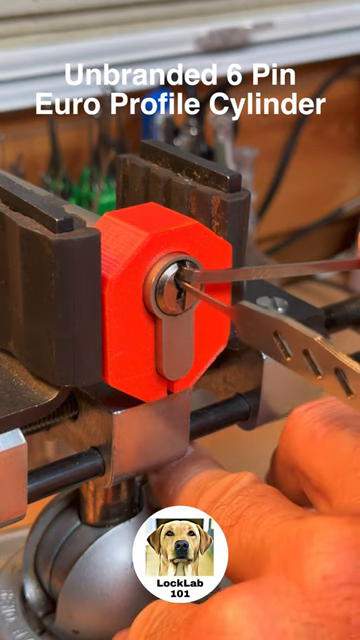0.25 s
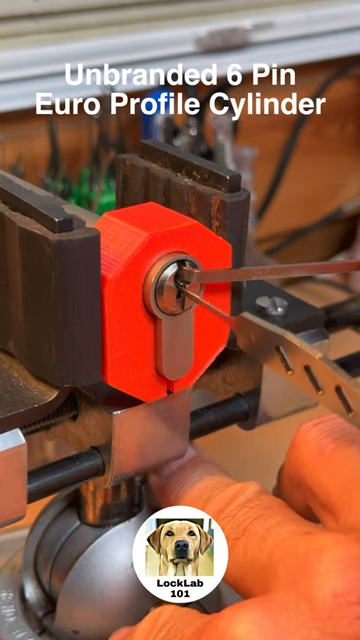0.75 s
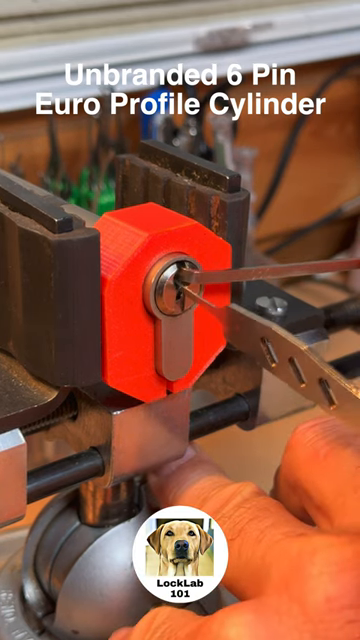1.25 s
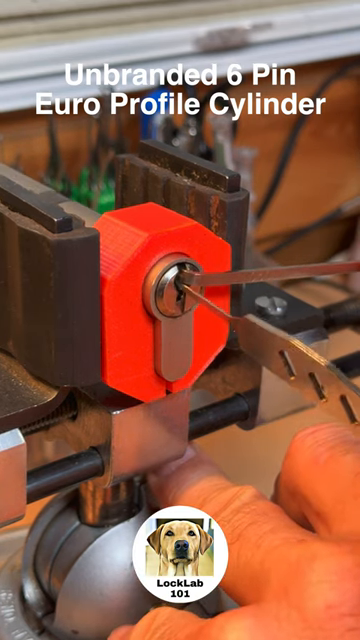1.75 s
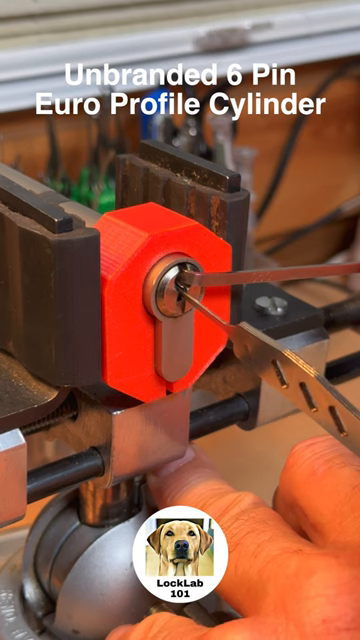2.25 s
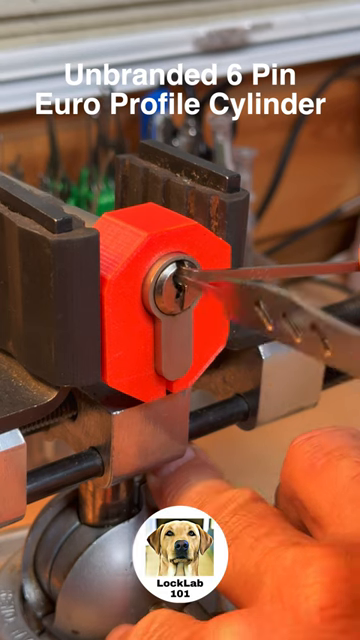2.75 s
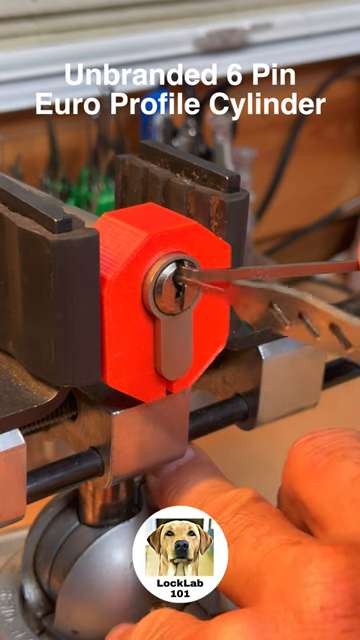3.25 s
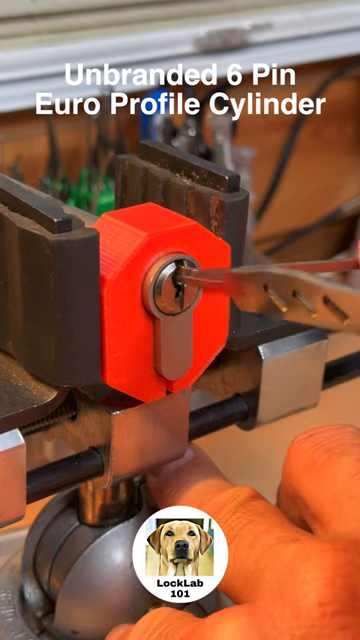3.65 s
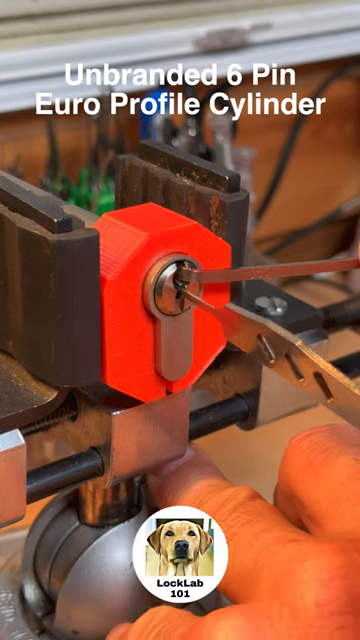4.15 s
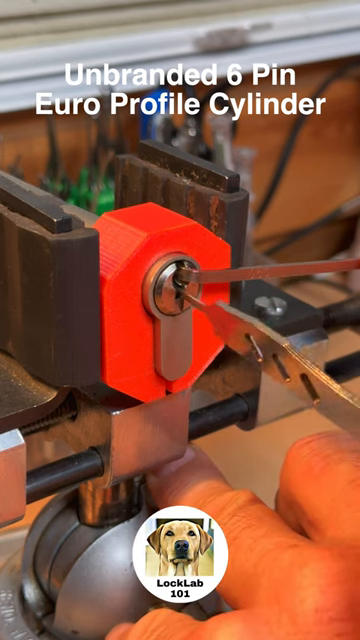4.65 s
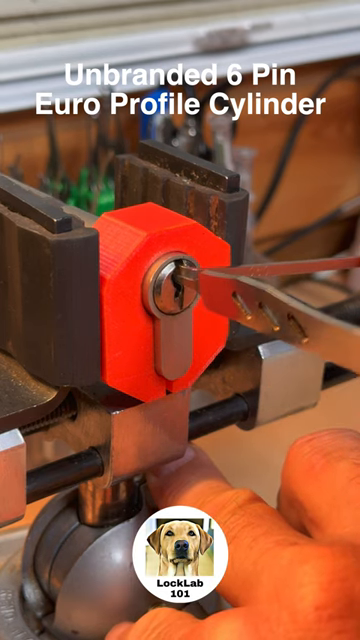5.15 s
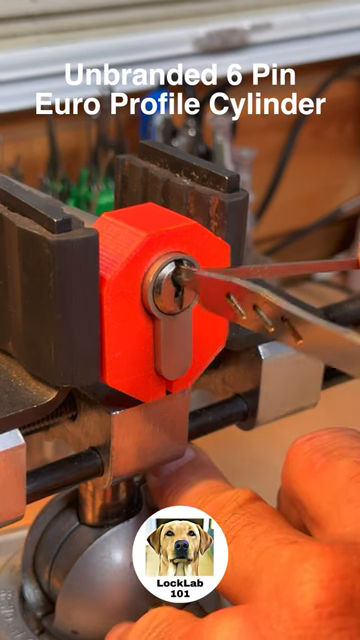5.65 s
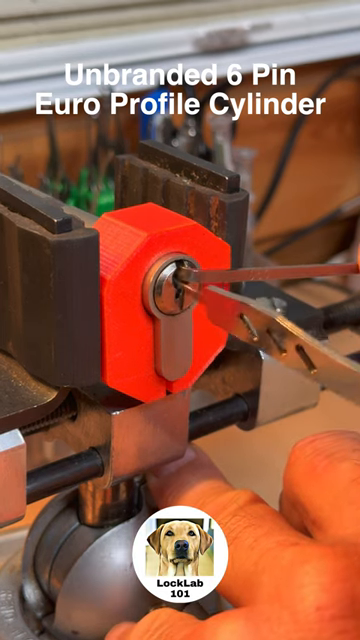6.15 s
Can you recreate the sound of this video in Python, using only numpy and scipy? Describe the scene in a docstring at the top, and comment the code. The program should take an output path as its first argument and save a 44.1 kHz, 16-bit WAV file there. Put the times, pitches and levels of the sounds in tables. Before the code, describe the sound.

A steel pick clicks, scrapes and slips over lock pins in a plastic block, with dull knocks, faint hum and a faint clock tick.

```python
"""A steel pick lifts the pins of a lock held in a plastic block in a bench vice, for about six seconds.
From the start the room hums and whines faintly, a clock ticks each second, and fingers rub (filtered noise).
Slips of the pick begin at 0.1 s: bursts of tiny metal contacts, each followed by a holder knock and a stand thump.
Creaks join at 0.5 s and singing tones of the pick at 1.4 s; the hardest slip comes at 2.1 s, a strong pair at
3.5 s, and slips go on to the end. Last, a noise suppressor turns the steady noise down between the sounds."""
import sys
import numpy as np
from scipy import signal
from scipy.fft import rfft, irfft, next_fast_len
from scipy.io import wavfile
from scipy.ndimage import uniform_filter1d

SR = 44100
rng = np.random.default_rng(int(sys.argv[2]) if len(sys.argv) > 2 else 0)


def put_to_file(sound):
    """Save the sound as 16-bit audio at rate SR, in the file named by the first command-line argument."""
    columns = np.atleast_2d(sound).T  # one column per channel
    safe = np.clip(columns, -1, 1)
    whole_steps = np.round(safe * 32767)
    wavfile.write(sys.argv[1], SR, whole_steps.astype(np.int16))


N = 281799  # length in samples


def from_db(db):
    """Turn decibels into a plain loudness factor."""
    return 10 ** (np.asarray(db) / 20)


def rms_one(x):
    """Scale a signal to an average strength (rms) of 1."""
    return x / np.sqrt(np.mean(x ** 2) + 1e-20)


def at_hz(points, hz):
    """Read a curve of (Hz, value) points, with straight lines over log frequency."""
    point_hz, values = np.array(points).T
    return np.interp(np.log(hz), np.log(np.maximum(point_hz, 1)), values)


def band(x, low, high):
    """Keep only the part of a sound between two frequencies."""
    return signal.sosfilt(signal.butter(2, [low, high], "band", fs=SR, output="sos"), x + 1e-18)


def drift(rate):
    """Slow random wandering of spread about 1; a higher rate wanders faster."""
    knots = rng.standard_normal(int(N / SR * 100) + 2)  # 100 per second
    width = max(int(50 / rate), 1)
    smooth = uniform_filter1d(uniform_filter1d(knots, width), width)
    return np.interp(np.arange(N) / SR * 100, np.arange(len(knots)), rms_one(smooth))


def ring(force, modes):
    """A force sets several modes ringing side by side; each is a tone that dies away."""
    out = 0
    for k, (hz, level_db, t60) in enumerate(modes):
        r = from_db(-60 / (t60 * SR))  # what is left after one sample
        w = 2 * np.pi * hz / SR
        tone = signal.lfilter([0, np.sin(w)], [1, -2 * r * np.cos(w), r * r], force + 1e-18)
        out = out + (-1) ** k * from_db(level_db) * tone  # signs alternate
    return out


def grit(shape, spread_db):
    """Dense contacts of uneven size, as noise of rms 1."""
    return rms_one(rng.standard_normal(shape) * from_db(spread_db * rng.standard_normal(shape)))


def swells(rows):
    """Each row (start s, length s, dB) rises and falls smoothly over its length."""
    out = np.zeros(N + SR)
    for s, length, level_db in rows:
        shape = np.hanning(int(length * SR))
        at = round(s * SR)
        out[at:at + len(shape)] += from_db(level_db) * shape
    return out[:N]


def pushes(levels_db, soft_s, delay_s):
    """One rounded push for every slip, a little after it; a longer push is softer."""
    force = np.zeros(N + SR)
    at = ((np.array(SLIPS)[:, 0] + delay_s) * SR).astype(int)
    force[at] = from_db(levels_db)
    shape = np.hanning(int(soft_s * SR) + 3)
    return np.convolve(force, shape / shape.sum())[:N]


# Colour of the room noise. Each row: frequency in Hz, relative level in dB per Hz.
AIR_COLOUR = [(30, -7), (60, -3), (130, -8.5), (300, -20), (700, -26), (1500, -33.5), (3500, -42.5),
              (7000, -44.5), (11000, -46), (16000, -70.5)]
# How alike the left and right ports hear the room. Each row: frequency in Hz, likeness (0 none, 1 the same).
LIKENESS = [(60, 0.99), (200, .9), (300, 0.22), (480, 0.37), (800, 0), (1300, .3), (1700, 1), (16000, 0.93)]
# Mains hum and electric whines. Each row: frequency in Hz, level in dB rms before the waver.
HUM_TONES = [(200, -69), (7381, -87.5), (10637, -102), (14761, -90)]
AIR_DB, HUM_WAVER_DB = -61.5, 1.5


def two_ports(mid, side, hz):
    """Blend shared and opposite noise into left and right, as alike as the room makes them at this frequency."""
    alike = np.clip(at_hz(LIKENESS, hz), 0, 1)
    return np.sqrt(1 + alike) * mid + np.sqrt(1 - alike) * side * [[1], [-1]]


def air():
    """Room noise, least alike at the two ports in the middle range, with mains hum and thin electric whines."""
    hz = np.maximum(np.arange(N // 2 + 1) * SR / N, 1)
    mid, side = rfft(rng.standard_normal((2, N)))
    both = two_ports(mid, side, hz)
    out = from_db(AIR_DB) * rms_one(irfft(both * from_db(at_hz(AIR_COLOUR, hz)), N))
    for tone_hz, level_db in HUM_TONES:
        size = np.sqrt(2) * from_db(level_db + HUM_WAVER_DB * drift(8))
        out += size * np.sin(2 * np.pi * tone_hz * np.arange(N) / SR)
    return out


# How long the room echoes. Each row: frequency in Hz, time in seconds to fall by 60 dB.
ROOM_DECAY = [(300, 0.2), (1000, 0.17), (3000, 0.18), (8000, .2), (15000, 0.027)]
# Tone of the echoes. Each row: frequency in Hz, relative level in dB.
ROOM_TONE = [(300, 2), (800, 2.5), (2000, -3), (15000, -4.5)]
ROOM_DB, ROOM_RISE_S = -11, 0.0024


def room(x):
    """Dense reflections: noise that dies band by band, as alike at the two ports as the room noise."""
    t = np.arange(int(.4 * SR)) / SR
    edges = 200 * 2 ** np.arange(0, 7.0, .5)  # half-octave bands from 200 Hz
    tail = 0
    for low, high in zip(edges, edges[1:]):
        mid, side = band(rng.standard_normal((2, len(t))), low, high)
        hz = np.sqrt(low * high)
        fade_db = -60 * t / at_hz(ROOM_DECAY, hz)
        tail = tail + two_ports(mid, side, hz) * from_db(fade_db + at_hz(ROOM_TONE, hz))
    tail *= np.clip(t / ROOM_RISE_S, 0, 1) ** 2
    tail /= np.sqrt(np.sum(tail ** 2) / 2)
    return from_db(ROOM_DB) * signal.oaconvolve(x[None], tail, axes=1)[:, :N]


# Clock ticks. Each row: start in seconds, relative level in dB.
CLOCK_TICKS = [(0.005, -70.5), (1, -77), (2.002, -70.5), (3.0, -82), (4.001, -70.5), (5.001, -77.5),
               (6.001, -65.5)]
# Rattles within one tick. Each row: delay in seconds, relative level in dB.
TICK_RATTLES = [(0, 0.5), (.008, 4), (0.022, 1.5), (0.037, -5.5), (0.059, -5)]
# Ringing of the clock case. Each row: frequency in Hz, relative level in dB, seconds to fall by 60 dB.
CLOCK_CASE = [(1110, -4.5, 0.027), (1248, 8, .07), (1849, -16, .02), (2850, -4.5, 0.031),
              (4100, -2.5, 0.019), (5000, -17.5, .02)]


def clock():
    """Each tick is a few blurred rattles, heard directly and through the case."""
    force = np.zeros(N + SR)
    t = np.arange(SR // 10) / SR
    for s, level_db in CLOCK_TICKS:
        for delay, step_db in TICK_RATTLES:
            at = round((s + delay) * SR)
            fade = from_db(level_db + step_db - 24 - 60 * t / .06)
            force[at:at + len(t)] += fade * rng.standard_normal(len(t))
    force = force[:N]
    return ring(force, CLOCK_CASE) + from_db(21.5) * band(force, 900, 16000)


# Hands on the tools. Each row: time in seconds, relative rub on the holder in dB, relative stand sway in dB.
HAND_MOVES = [(0.0, -80.5, -79), (0.16, -51.5, -60), (0.4, -88, -69.5), (0.6, -69, -56.5),
              (1.1, -97, -75.5), (1.42, -71.5, -54), (1.6, -93, -68.5), (2.0, -76.5, -70),
              (2.4, -66, -53.5), (2.7, -87.5, -75.5), (3.05, -96, -80), (3.2, -62.5, -65),
              (3.55, -67.5, -58.5), (3.85, -67.5, -71.5), (4.7, -75.5, -68.5), (5.3, -66, -65.5),
              (5.75, -74.5, -56.5), (6.1, -62, -70), (6.39, -61.5, -54)]


def hands():
    """Glide from row to row, giving the levels of the rub and of the sway over time."""
    s, rub_db, sway_db = np.transpose(HAND_MOVES)
    t = np.arange(N) / SR
    return np.interp(t, s, rub_db), np.interp(t, s, sway_db)


# Vice on its ball stand. Each row: frequency in Hz, relative level in dB, seconds to fall by 60 dB.
STAND_MODES = [(53.3, 5, .25), (82, -1, 0.14), (97, -12, 0.9), (121, 1, 0.1)]


def stand(sway_db):
    """The heavy stand thumps in low, slow tones after each slip and sways under the hands."""
    sway = from_db(sway_db) * rms_one(ring(rng.standard_normal(N), STAND_MODES))
    thump_db = np.array(SLIPS)[:, 6]
    thump = ring(pushes(thump_db, soft_s=0.0049, delay_s=0.0092), STAND_MODES)
    return from_db(3.5) * thump + from_db(-3.5) * sway


# Plastic holder. Each row: frequency in Hz, relative level in dB, seconds to fall by 60 dB.
HOLDER_MODES = [(416.7, -3, 0.074), (439.4, 3, 0.046), (479.3, 3, 0.06), (607, -5.5, .06),
                (714.7, -6.5, 0.046), (782.3, -12, 0.043), (888, -18, 0.13), (1110, -5.5, 0.03)]
# Jaws of the vice. Each row: frequency in Hz, relative level in dB, seconds to fall by 60 dB.
JAW_MODES = [(150, -4, 0.063), (218, -2, 0.038), (269, -5, 0.24), (318.6, 2, 0.097), (366.5, -6.5, 0.11)]
# The holder creaks under the wrench. Each row: start in seconds, length in seconds, relative level in dB.
HOLDER_CREAKS = [(0.51, 0.16, -60.5), (0.87, 0.087, -52), (1.87, .065, -73.5), (2.28, 0.062, -56),
                 (2.34, 0.084, -51), (2.42, 0.087, -41), (3.03, 0.039, -46), (3.09, .07, -57.5),
                 (3.7, .13, -59.5), (3.875, .075, -58.5), (4.11, 0.086, -62), (4.195, 0.056, -61),
                 (4.75, .14, -52.5), (5.15, 0.064, -70), (5.57, 0.041, -66), (5.645, 0.047, -60),
                 (6.08, 0.16, -64.5)]
# The upper modes answer the metal: dB over it, and dB per dB of brightness.
RAP_DB, RAP_PER_BRIGHT = 3, -2.6


def holder(rub_db):
    """Block and jaws answer a few ms after each slip and mutter under the fingers; the block also creaks."""
    rub = from_db(rub_db + 2.6 * drift(25)) * grit(N, spread_db=3.5)
    creak = swells(HOLDER_CREAKS) * grit(N, spread_db=-1)
    metal_db, bright_db, knock_db, jaw_db = np.array(SLIPS)[:, 2:6].T
    knock = from_db(4.5) * pushes(knock_db, soft_s=0.0011, delay_s=.003)
    rap = pushes(metal_db + RAP_DB + RAP_PER_BRIGHT * bright_db, soft_s=0.0008, delay_s=.0025)
    jaw_push = from_db(-0.5) * pushes(jaw_db, soft_s=0.0022, delay_s=.004)
    # knocks and creaks wake the three lowest modes, raps the others, rubbing all of them
    block = ring(knock + from_db(-30.0) * creak, HOLDER_MODES[:3])
    block = block + ring(rap, HOLDER_MODES[3:])
    block = block + ring(from_db(-41.0) * rub, HOLDER_MODES)
    return block + ring(jaw_push + from_db(-32) * rub, JAW_MODES)


# Tip or shaft of the pick sings after it is caught; the pitch follows grip and free length.
# Each row: start in seconds, relative level in dB, seconds to fall by 60 dB, frequency in Hz.
PICK_TONES = [(1.38, -48, 0.058, 5400), (1.457, -58, 0.046, 5060), (1.47, -57, 0.035, 5050),
              (1.487, -63, 0.04, 4990), (2.405, -59, .06, 5200), (2.662, -65.5, 0.038, 5150),
              (2.69, -73, .04, 5160), (2.715, -56, 0.062, 5200), (3.034, -51, 0.047, 5050),
              (3.055, -49, .05, 5090), (3.075, -70, .15, 5050), (3.176, -72, .1, 5000),
              (3.212, -66, .1, 5080), (3.659, -64, 0.036, 4900), (3.72, -72.5, 0.044, 5100),
              (3.76, -65, 0.037, 5100), (3.803, -72, .03, 4970), (1.379, -51, 0.046, 1570),
              (1.46, -52, .04, 2880), (2.408, -51, 0.052, 2950), (2.695, -61, 0.043, 2580),
              (3.056, -64, .06, 2710), (3.083, -61, 0.046, 2680), (3.121, -68, .04, 2590),
              (3.212, -63, .05, 2750), (3.505, -34, .05, 1630), (3.72, -63.5, 0.044, 2800),
              (3.747, -56, 0.026, 2940), (3.76, -62, .03, 2780), (5.217, -48, 0.034, 1970),
              (5.958, -54, 0.046, 2805), (6.308, -56, .03, 2780), (6.351, -49, 0.034, 2730),
              (5.22, -55, 0.087, 5950), (5.385, -57, 0.082, 5790), (5.656, -53, 0.036, 2410)]
SING_ATTACK_S = 0.0013


def singing(width_hz):
    """A narrow resonance kept going by rough friction: a tone whose size and phase wander."""
    t, out = np.arange(N) / SR, np.zeros(N)
    slow = signal.butter(2, width_hz, fs=SR, output="sos")
    wander = signal.sosfilt(slow, rng.standard_normal((2, N)))
    wander = rms_one(wander[0]) + 1j * rms_one(wander[1])
    for s, level_db, t60, hz in PICK_TONES:
        at = round(s * SR)
        since = t[:min(SR // 2, N - at)]
        end = at + len(since)
        size = (1 - np.exp(-since / SING_ATTACK_S)) * from_db(level_db - 60 * since / t60)
        out[at:end] += size * np.real(wander[at:end] * np.exp(2j * np.pi * hz * since))
    return from_db(-1) * out


# Slips of the pick. Each row: start in seconds, seconds for the chatter to sink by 9 dB, then relative levels:
# metal in dB, brightness in dB per band, holder knock in dB, jaw knock in dB, stand thump in dB.
SLIPS = [(0.105, 0.013, -48, 0, -66, -77, -83), (0.112, 0.041, -54, -3, -45.5, -38, -53.5),
         (0.411, 0.0056, -42.5, 14, -40.5, -45.5, -40), (0.416, 0.0082, -39.5, 0, -34.5, -61, -65.5),
         (0.424, 0.013, -45, 5.5, -51, -36.5, -42.5), (0.6716, 0.0022, -64.5, -7, -51.5, -52, -74),
         (0.6798, 0.0046, -62, 7.5, -48.5, -57, -52.5), (0.691, 0.0039, -56, -0.5, -51.5, -66, -52),
         (0.715, 0.0021, -54.5, 6.5, -54, -54, -86), (0.8206, 0.0035, -60, -3, -48, -56, -79),
         (0.8343, 0.0094, -40.5, 5.5, -37, -41.5, -55), (0.911, 0.0015, -54, 3, -70, -51.5, -57),
         (1.369, 0.0082, -79, -2, -58, -62, -76), (1.3771, 0.0061, -49, 2, -51.5, -52.5, -63),
         (1.395, 0.0083, -58, 1.5, -53.5, -54, -60.5), (1.4594, 0.0051, -59, 0, -47, -46.5, -50.5),
         (1.472, 0.0059, -60, -2.5, -65, -50, -50), (1.49, 0.0095, -66.5, 1.5, -55, -59, -66.5),
         (1.898, .0061, -76.5, -1, -65, -78.5, -74.5), (1.978, 0.0055, -76.5, -3, -79, -66.5, -62.5),
         (2.0257, 0.0066, -62.5, 1.5, -53.5, -59, -63.5), (2.1261, 0.0039, -19.5, 3, -23, -40, -38),
         (2.396, 0.0092, -63.5, 6, -47, -73, -65), (2.4074, 0.0047, -40.5, 6, -42.5, -43.5, -55),
         (2.439, 0.0043, -56, -1.5, -48, -47.5, -51), (2.664, .0028, -68.5, 0.5, -80, -66, -60),
         (2.6689, 0.0023, -63, 2.5, -64, -55, -60), (2.6966, .0027, -62.5, -0.5, -55.5, -58.5, -64),
         (2.719, 0.0033, -66, -3, -66, -89, -69), (2.7282, 0.0038, -56, 1.5, -62, -58, -57.5),
         (2.7538, 0.0047, -46.5, 3, -49.5, -57, -54), (2.768, 0.005, -50, 2.5, -83, -66, -55.5),
         (3.0332, 0.0026, -54.5, 3, -57, -60.5, -60.5), (3.057, 0.006, -65, 5.5, -79, -61, -67.5),
         (3.0829, 0.0039, -60.5, 9, -72, -58.5, -60), (3.123, 0.0021, -64.5, 3.5, -76, -59.5, -73),
         (3.1375, 0.0036, -66, 3.5, -80, -64, -64.5), (3.18, .0027, -73, -1, -75, -64, -79),
         (3.192, .0037, -68, 4, -65, -72.5, -71), (3.2108, 0.0036, -63, 6.5, -60, -75.5, -69.5),
         (3.216, 0.022, -72.5, 5, -62.5, -68, -62), (3.238, 0.033, -73, 4, -64, -55.5, -58),
         (3.29, 0.0066, -58, 5.5, -65, -56, -59.5), (3.2964, 0.0023, -44, 1, -54.5, -75.5, -67.5),
         (3.5047, 0.0058, -28, 1.5, -33, -38, -42.5), (3.5089, 0.0013, -27, 4.5, -55, -65, -85),
         (3.6593, .0048, -61.5, 3.5, -63.5, -60, -66.5), (3.7217, 0.0017, -70, 2, -57.5, -60, -67),
         (3.7474, 0.0023, -55.5, 3.5, -78, -58, -70), (3.76, 0.0014, -54, 5, -52.5, -51, -78),
         (3.777, .003, -64, 4, -68, -76, -72.5), (3.8030, .0025, -65.5, 2, -57, -53, -57),
         (4.191, 0.0047, -75.5, -4, -94, -67.5, -62), (4.27, .016, -80.5, -0.5, -64.5, -70, -60),
         (4.546, 0.0037, -65, 3.5, -60.5, -54.5, -65), (4.56, .029, -82, -1, -65, -56, -58.5),
         (4.5818, 0.003, -55, 1, -54.5, -57, -73), (4.7006, 0.0052, -68, 1.5, -70, -62, -65.5),
         (4.815, 0.005, -65.5, 4.5, -61, -53.5, -62), (4.854, 0.0044, -62.5, -1, -65, -47.5, -73),
         (4.8703, 0.0066, -34.5, 6.5, -41, -53, -51.5), (5.1128, 0.0037, -72, 2, -71.5, -78, -64),
         (5.1853, 0.0043, -77.5, -9, -56, -51.5, -68), (5.2153, 0.005, -42, 6, -58, -63, -58.5),
         (5.3834, 0.0038, -42.5, 5.5, -55.5, -66, -89), (5.542, 0.0048, -66.5, -1, -61, -51, -62),
         (5.5526, 0.0051, -36, 7.5, -44.5, -42, -49.5), (5.654, 0.0052, -62.5, -1, -50, -57, -53),
         (5.7465, 0.0049, -38, 3.5, -44, -51.5, -54), (5.8763, 0.005, -68, 9.5, -83, -78, -77),
         (5.895, 0.0047, -68.5, 1, -80, -75, -58), (5.9266, 0.0078, -69.5, 0.5, -64, -56.5, -61),
         (5.9571, 0.0054, -51.5, 6, -59, -63.5, -56.5), (5.967, 0.0047, -57.5, 0, -54.5, -50, -54.5),
         (5.984, 0.011, -66.5, -1.5, -50, -52, -58.5), (6.098, 0.0043, -65.5, 2, -67, -58, -68),
         (6.11, 0.0036, -71.5, -1, -64.5, -59.5, -63), (6.2206, 0.0075, -66, 2.5, -43.5, -52, -51),
         (6.2328, 0.0059, -61.5, 0.5, -57, -58.5, -61), (6.2595, 0.0064, -69.5, -5.5, -79, -74, -74),
         (6.296, 0.0067, -77, -1, -68, -69, -69), (6.3081, 0.0057, -66.5, -5.5, -52.5, -49.5, -54.5),
         (6.341, 0.0081, -61.5, 6, -72, -43.5, -55), (6.3473, 0.0038, -50.5, 1.5, -47, -52, -73)]
# The pick drags over the pins. Each row: start in seconds, length in seconds, relative level in dB.
PIN_SCRAPES = [(0.08, .18, -65.5), (0.66, 0.25, -97), (1.36, .14, -83), (2.66, 0.22, -73),
               (3.0, 0.14, -67.5), (3.17, 0.097, -68.5), (3.7, 0.19, -91), (3.85, 0.41, -82),
               (4.5, 0.12, -82), (5.4, 0.75, -80.5), (5.95, 0.16, -72), (6.3, 0.2, -74.5)]
# Bands of the contact noise. Each row: lower edge in Hz, upper edge in Hz.
METAL_BANDS = [(600, 2500), (2500, 5500), (5500, 9500), (9500, 19000)]
# Tone common to all slips: one relative level in dB for each band.
METAL_TONE_DB = [-1.5, -0.72, 0.5, -0.5]
# Wrench and plug. Each row: frequency in Hz, relative level in dB, seconds to fall by 60 dB.
STEEL_MODES = [(1600, -5.5, 0.014), (2030, -5, 0.058), (2556, 4.5, 0.008), (4170, -8, 0.0044),
               (5800, -14.5, 0.0089), (7427, -4, 0.032), (8050, -1.5, .02), (10760, -4.5, .015),
               (12800, -1.5, 0.041), (14700, 0.5, 0.022)]


def metal():
    """Slips and scraping are bursts of tiny contacts, heard directly and through the modes of the steel."""
    t = np.arange(SR // 10) / SR
    scrape = swells(PIN_SCRAPES) * from_db(1.7 * drift(40)) * from_db(-10)
    strength = np.tile(scrape, (4, 1))  # one row for each band
    steps = np.arange(4) - 1.5  # brightness tilts the bands around their middle
    for s, length, level_db, bright_db, *_ in SLIPS:
        shape = (1 - np.exp(-t / 0.0011)) * from_db(-9.0 * (t / length) ** 2)
        band_db = level_db + bright_db * steps + METAL_TONE_DB
        at = round(s * SR)
        strength[:, at:at + len(t)] += from_db(band_db)[:, None] * shape[:N - at]
    contacts = strength * grit((4, N), spread_db=-1.5)
    force = 0
    for noise, (low, high) in zip(contacts, METAL_BANDS):
        force = force + band(noise, low, high) * np.sqrt(SR / 2 / (high - low))  # make up for the band's width
    # every slip touches another spot, so it wakes the modes in its own proportions
    latest = np.searchsorted(np.array(SLIPS)[:, 0], np.arange(N) / SR)
    spots = from_db(4 * rng.standard_normal((len(SLIPS) + 1, len(STEEL_MODES))))
    rings = sum(ring(force * spot[latest], [mode]) for spot, mode in zip(spots.T, STEEL_MODES))
    return from_db(-1.0) * force + from_db(-33.5) * rings


def scene():
    """Add up all the sources and their echoes in the room."""
    rub_db, sway_db = hands()
    metal_and_clock = metal() + singing(width_hz=64) + clock()
    block = holder(rub_db)
    # the block reaches the microphone mostly through the bench, so less of it fills the room
    echoes = room(metal_and_clock + from_db(-2) * block)
    return metal_and_clock + block + echoes + stand(sway_db) + air()


SUPPRESS_DB = -8.5  # gain of a band that is fully turned down
OPEN_DB = 2.5  # height over the steady noise that halves this cut


def suppress(x):
    """Where a band holds only its steady noise the gain sinks; any sound above it lets the noise through too."""
    spectra = signal.stft(x, nperseg=1024, noverlap=768)[2]
    power = np.mean(np.abs(spectra) ** 2, axis=0)
    power = uniform_filter1d(uniform_filter1d(power, size=9, axis=0), size=5, axis=1)
    steady = np.percentile(power, 25, axis=1, keepdims=True) + 1e-20
    over = power / steady / from_db(2 * OPEN_DB)  # doubled dB, because this compares powers
    gain = from_db(SUPPRESS_DB / (1 + over ** 2))
    return signal.istft(spectra * gain, nperseg=1024, noverlap=768)[1][:, :N]


# Cavity before the microphone. Each row: frequency in Hz, relative level in dB, seconds to fall by 60 dB.
PORT_CAVITY = [(14400, -12, 0.0041)]
# Timing of the microphone pair. Each row: frequency in Hz, phase in radians by which left leads right.
LEFT_LEAD = [(300, 0), (520, .2), (1210, 0), (4400, 0), (5500, -.3), (7060, -1.3), (10200, -2.5),
             (11800, -np.pi), (13600, -3.6), (15200, -4.4), (17000, -4.4)]
# Balance of the microphone pair. Each row: frequency in Hz, left minus right in dB.
LEFT_LEAN = [(200, 0), (300, 1.5), (480, 3.2), (700, 1), (1290, 0)]
RUMBLE_CUT_HZ, TOP_CUT_HZ = 40, 17000


def record(dry):
    """Two ports agree in the bass and part in phase towards the treble; rumble, steady noise and top are cut."""
    dry = dry + ring(dry, PORT_CAVITY)
    size = next_fast_len(N + SR // 10)
    hz = np.maximum(np.arange(size // 2 + 1) * SR / size, 1)
    # left gets half of the difference, right the opposite half
    half = from_db(at_hz(LEFT_LEAN, hz) / 2) * np.exp(.5j * at_hz(LEFT_LEAD, hz))
    ports = irfft(rfft(dry, size) * [half, 1 / half], size)[:, :N]
    no_rumble = signal.butter(6, RUMBLE_CUT_HZ, "high", fs=SR, output="sos")
    ports = suppress(signal.sosfilt(no_rumble, ports))
    return signal.sosfilt(signal.cheby2(12, 70, TOP_CUT_HZ, fs=SR, output="sos"), ports)


dry = scene()
out = record(dry)
put_to_file(out)
```